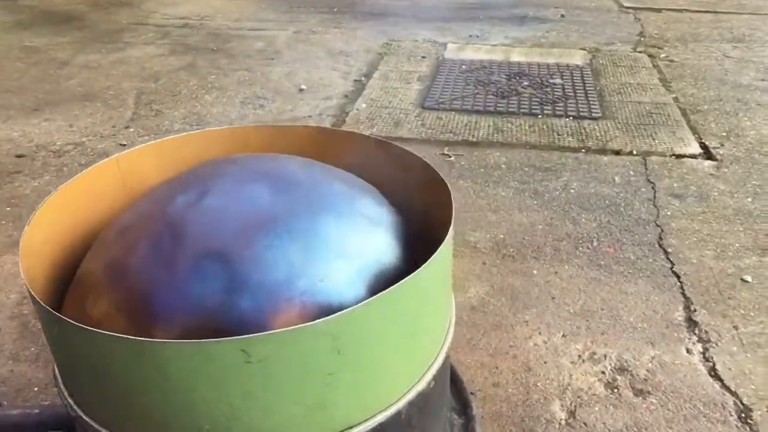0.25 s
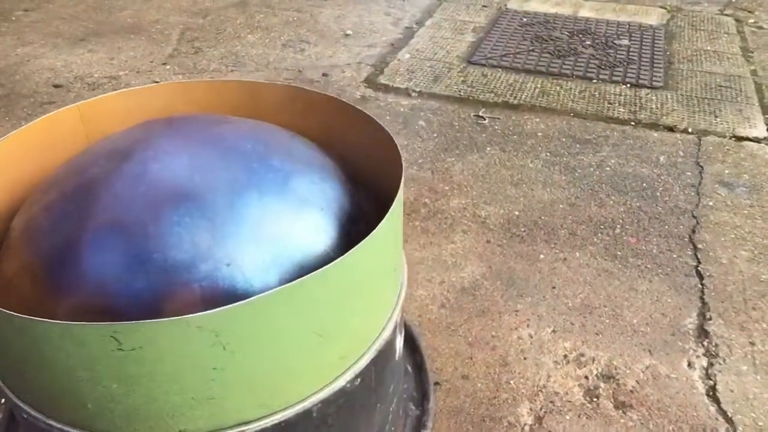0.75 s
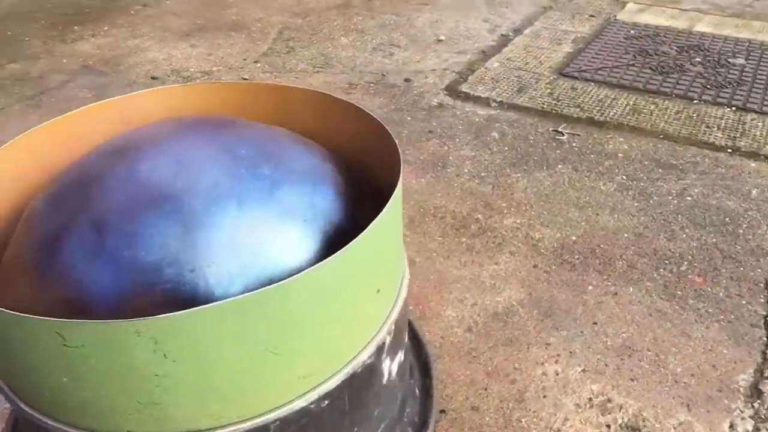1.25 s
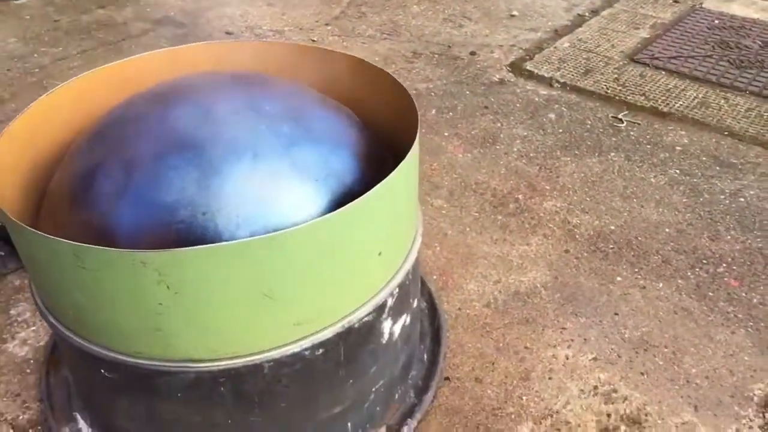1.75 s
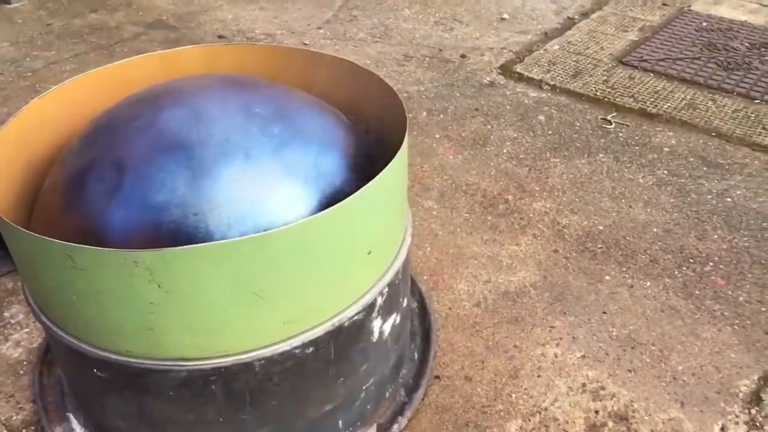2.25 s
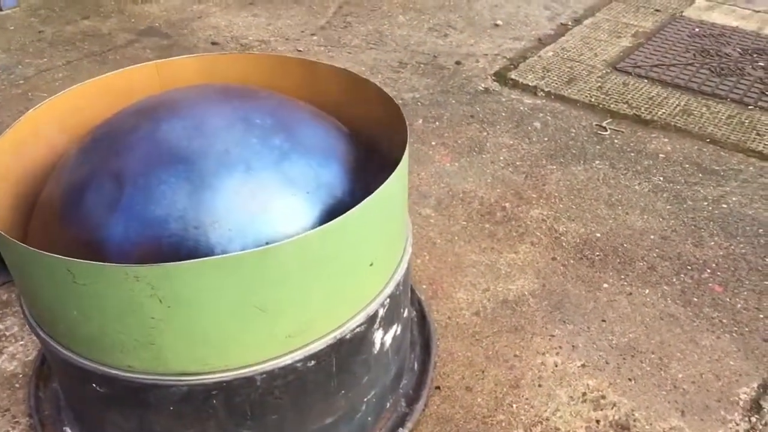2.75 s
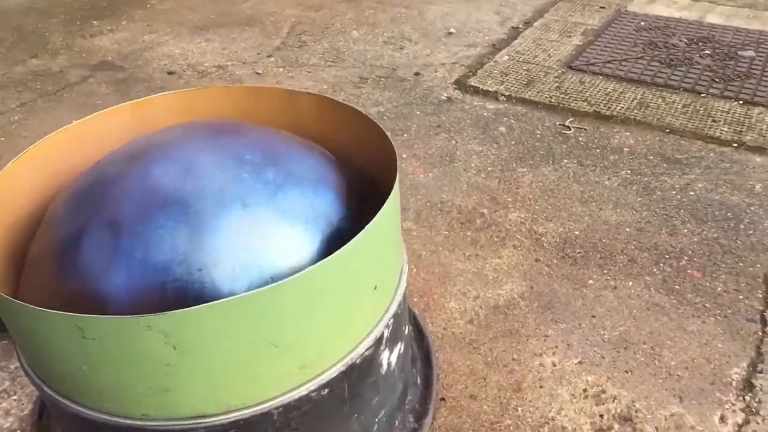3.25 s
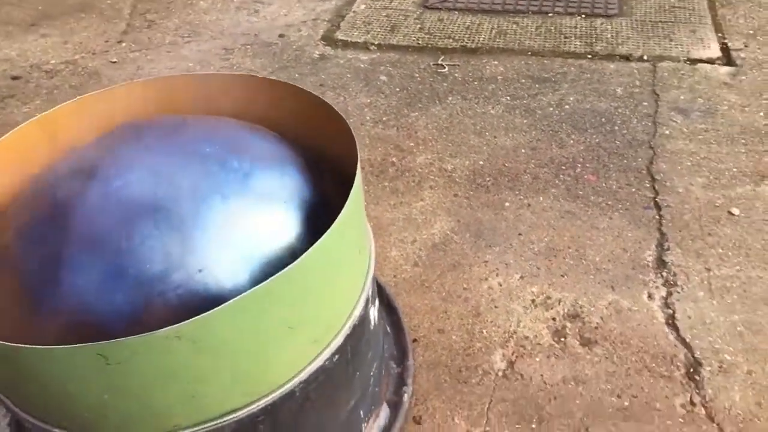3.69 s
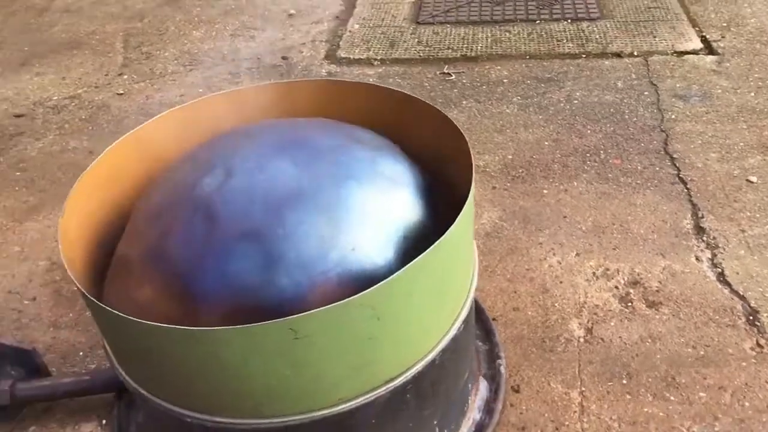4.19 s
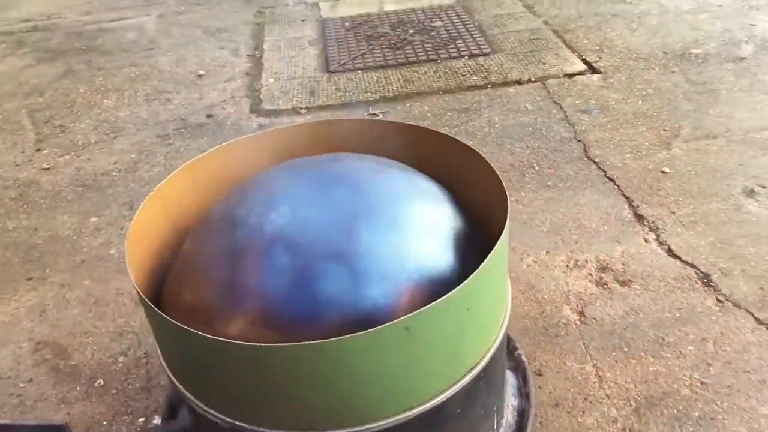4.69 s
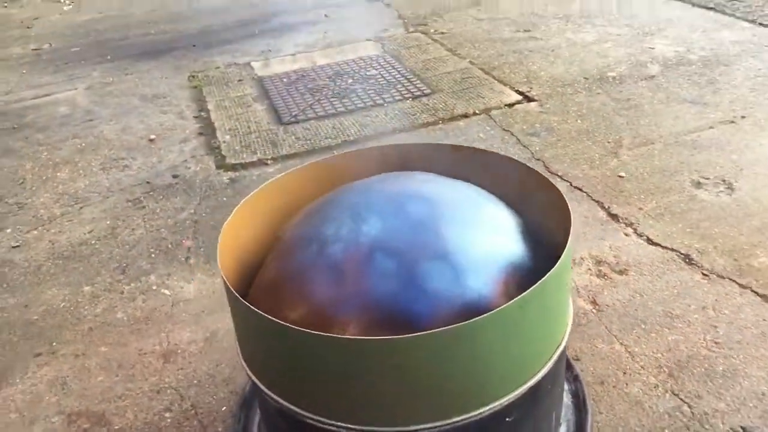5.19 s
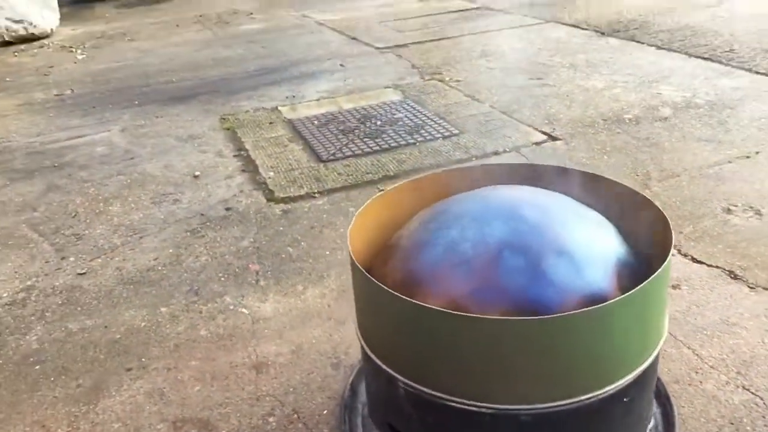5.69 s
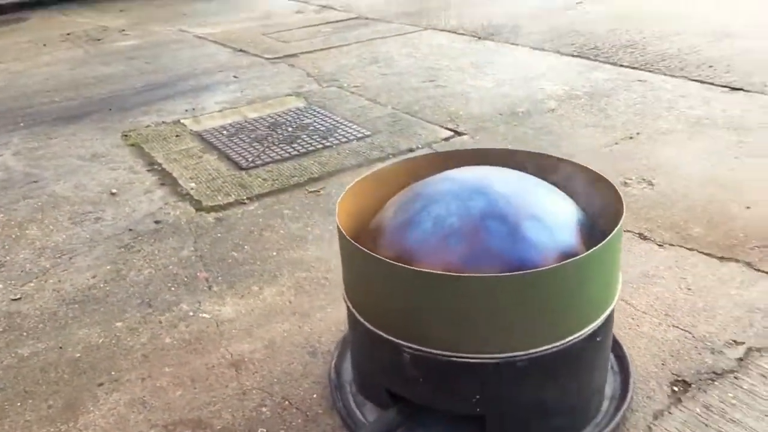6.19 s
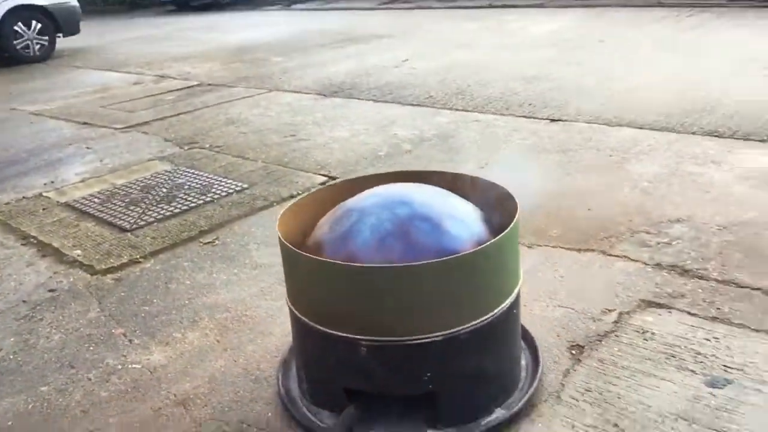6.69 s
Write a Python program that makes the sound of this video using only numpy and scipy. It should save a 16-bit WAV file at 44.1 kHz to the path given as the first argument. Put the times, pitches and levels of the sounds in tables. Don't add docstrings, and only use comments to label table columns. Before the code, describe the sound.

A large gas burner is already roaring at the start and never stops over about seven seconds. It burns under a steel dome inside a cut-down drum on an open concrete yard. The flame gives a deep, hollow, lumpy rumble, mostly low boom, with soft thuds as pockets of gas catch. Above it a bright, wide gas hiss sizzles and shimmers, faintly ringing with airy pipe overtones. The flame dips briefly at 0.7, then a short falling whoosh of wind passes at 1.2. The boom swells around 1.5, weakens after 2.3, and between 2.8 and 3.1 stutters in quick dips with a thud, a spurt of gas and another short gust. It fills out again near 4. From about 4.2 the microphone backs away; by 5.3 to 5.9 the hiss is stronger and more exposed, with small flutters and a faint gust. The roar continues to the end over a very faint distant wash.

```python
import sys
import numpy as np
from scipy import signal
from scipy.fft import rfft, irfft, next_fast_len
from scipy.io import wavfile
from scipy.ndimage import uniform_filter1d, map_coordinates

SR = 44100
rng = np.random.default_rng(int(sys.argv[2]) if len(sys.argv) > 2 else 0)


def int16_out(signal):
    q = np.round(np.clip(np.atleast_2d(signal).T, -1, 1) * 32767)
    wavfile.write(sys.argv[1], SR, q.astype(np.int16))


def field_ratio(decibels):
    return 10 ** (np.asarray(decibels, dtype=float) / 20)


N = 306054
N_FFT = next_fast_len(N)
HZ = np.arange(N_FFT // 2 + 1) * SR / N_FFT + 1e-3
COARSE_S = np.arange(N // 40 + 2) * 40 / SR
CUTOFF_HZ = 15720


def rms_one(x):
    return x / np.sqrt(np.mean(x ** 2) + 1e-20)


def in_time(rows):
    s, *columns = np.transpose(rows)
    return [np.interp(COARSE_S, s, c) for c in columns]


def at_hz(points, hz):
    points_hz, points_db = np.transpose(points)
    return np.interp(np.log(hz), np.log(points_hz), points_db)


def bumps(rows, clock):
    return sum(db * np.exp(-((clock - s) / half_s) ** 2) for s, half_s, db in rows)


def fine(control):
    return np.interp(np.arange(N) / SR, COARSE_S, control)


def drift(rate_hz):
    r = np.exp(-2 * np.pi * rate_hz * COARSE_S[1])
    settle = 2000
    noise = rng.standard_normal(len(COARSE_S) + settle)
    slow = signal.lfilter([1], [1, -2 * r, r * r], noise)[settle:]
    return rms_one(slow - slow.mean())


def turbulence(response):
    return rfft(rng.standard_normal(N_FFT)) * response


def evened(x, window_s):
    size = int(window_s * SR)
    power = uniform_filter1d(uniform_filter1d(x ** 2, size), size)
    return x / np.sqrt(power + 1e-20)


def slice_of(spectrum, centres_hz, k):
    triangle = np.interp(HZ, centres_hz, np.arange(len(centres_hz)) == k)
    return irfft(spectrum * triangle)[:N]


def flame():
    # [t/s, level/dB]
    vigour = [(0.0, -26), (.2, -27), (.32, -29.5), (.5, -27), (.62, -33.5), (.9, -32), (1.5, -26.5),
              (2.0, -28), (2.3, -32), (2.5, -29), (2.85, -31.5), (3.45, -32), (4.05, -26), (4.9, -27),
              (5.45, -29), (5.95, -33), (6.2, -29.5), (6.94, -32)]
    # [f/Hz, density/dB per Hz]
    rumble_colour = [(18, -60), (30, -39), (59, -11), (110, -5), (150, -1.5), (195, .5), (225, -7),
                     (257, -12), (288, -11.5), (305, -15.5), (335, -25.5), (360, -23.5), (397, -39),
                     (470, -49), (600, -69), (1000, -120)]
    # [t/s, half length/s, level/dB]
    thuds = [(.12, 0.11, 11.5), (.29, .03, 3.5), (1.1, 0.11, 3), (1.66, 0.028, 2), (1.9, .05, -1),
             (2.51, .04, 5), (2.74, 0.044, 5.5), (2.98, .03, 11), (3.25, 0.077, 6), (3.6, 0.055, 4),
             (4.05, .05, 4), (4.75, .06, 3), (5.16, 0.038, 1), (5.7, 0.069, 4), (6.17, 0.068, 4),
             (6.5, .08, 5), (6.86, 0.036, 8)]
    # [t/s, half length/s, level/dB]
    licks = [(.1, 0.1, 4), (.55, .1, 2), (.9, 0.072, -5.5), (1.75, 0.039, 0), (2.45, 0.1, 2.5),
             (2.65, 0.044, -2.5), (3.0, 0.086, 3), (3.48, 0.1, -4), (4.0, 0.21, 2.5), (4.65, 0.15, 2.5),
             (5.18, 0.069, 2.5), (5.6, 0.09, 4), (5.93, 0.075, -5), (6.52, 0.055, 7.5)]
    # [level/dB], [share of vigour swing], [chance surges/dB]
    voice_db = [-40.5, -30, -42]
    follow_vigour = [0.16, 1.0, 0.29]
    lumps_db = [2, 1.6, 2]

    noise = irfft(turbulence(field_ratio(at_hz(rumble_colour, HZ))))[:N]
    rumble = rfft(np.pad(noise, (0, N_FFT - N)))
    corners_hz = [95, 125, 215, 245]
    voice_gains = [[1, 0, 0, 0], [0, 1, 1, 0], [0, 0, 0, 1]]
    shares = [np.interp(HZ, corners_hz, gains) for gains in voice_gains]

    swing_db = in_time(vigour)[0] + 30
    levels_db = [db + follow * swing_db + lump_db * drift(7.0)
                 for db, follow, lump_db in zip(voice_db, follow_vigour, lumps_db)]
    levels_db[0] = levels_db[0] + bumps(thuds, COARSE_S)
    levels_db[2] = levels_db[2] + bumps(licks, COARSE_S)
    out = 0
    for db, share in zip(levels_db, shares):
        out = out + fine(field_ratio(db)) * evened(irfft(rumble * share)[:N], 0.17)
    return out


def pipe_ripple(between_db, widen):
    # [f/Hz, width/Hz, level/dB]
    overtones = [(554, 25, -6), (732, 28, -5), (964, 55, -2), (1250, 44, 0), (1555, 60, 0), (1850, 60, -1),
                 (1975, 50, -9), (2170, 60, -2), (2440, 53, -2), (2540, 50, -10), (2735, 55, -5),
                 (3020, 60, -4), (3280, 61, -7), (3580, 70, -14), (4215, 70, -15), (4515, 70, -7),
                 (4800, 70, -4), (5090, 60, -4), (5390, 110, -6), (5690, 80, -12), (6060, 80, -12),
                 (6365, 70, -11), (6690, 90, -13), (7500, 90, -13), (9030, 170, -11)]
    power = field_ratio(between_db) ** 2
    for hz, width_hz, level_db in overtones:
        detune = 2 * (HZ - hz) / (widen * width_hz)
        power = power + field_ratio(0.64 * level_db) ** 2 / (1 + detune ** 2) ** 2
    smooth = uniform_filter1d(power, int(600 / HZ[1]))
    return np.sqrt(power / smooth)


def jet_levels(at_place):
    # [t/s, level/dB]
    sight = [(0.0, -35.5), (.09, -42.5), (.23, -39), (.29, -36.5), (.56, -41), (.73, -34.5), (.9, -40.5),
             (1.3, -43.5), (1.95, -44), (2.7, -40), (3.45, -41), (3.73, -44.5), (4.06, -42), (4.3, -36),
             (5.19, -39), (5.26, -35), (5.87, -32.5), (6.94, -36.5)]
    # [t/s, half length/s, level/dB]
    spurts = [(.02, 0.024, 1.5), (.23, 0.027, 0.5), (.62, 0.097, 2.5), (1.2, .04, 0.5), (2.01, .03, 2.5),
              (2.14, 0.02, 5), (2.55, .025, 2), (2.68, 0.039, 1), (2.975, 0.031, 8), (3.2, .06, 0.5),
              (3.5, 0.03, 2.5), (4.25, 0.036, 1), (4.8, 0.4, 1.5), (5.1, 0.034, 3), (5.19, 0.03, -1),
              (5.3, .035, 4), (5.52, 0.02, 1), (5.69, .04, 3), (5.78, 0.024, 1.5), (5.87, .03, 3),
              (6.4, 0.035, -3.5), (6.55, .03, -2.5), (6.73, 0.05, 1), (6.84, .03, -2)]
    range_db = [
        [-52, -53, -51.5, -48, -47],
        [-44, -43.5, -43.5, -47.5, -47],
        [-44.5, -44.5, -44, -45.5, -43.5],
        [-39.5, -40.5, -41, -40, -40],
    ]
    follow_sight = [.3, .4, .95, 1.02]
    spurt_share = [0.91, 1.01, 0.96, 0.43]

    swing_db = in_time(sight)[0] + 39
    spurt_db = bumps(spurts, COARSE_S)
    return [at_place(db) + follow * swing_db + share * spurt_db
            for db, follow, share in zip(range_db, follow_sight, spurt_share)]


def jet():
    # [t/s, place 0-4 from close by to far back]
    viewpoint = [(0, 0.0), (.84, 0.0), (.9, 1.0), (4.0, 1.0), (4.25, 2.0), (5.1, 2.0), (5.3, 3.0),
                 (6.1, 3.0), (6.45, 4.0), (6.94, 4.0)]
    # [f/Hz, density/dB per Hz]
    pipe_colours = [
        [(400, -6), (554, -5), (732, -2.5), (964, -1.5), (1250, 5), (1560, 4.5), (1850, 3), (2170, 4),
         (2440, 2.5), (2730, -0.5), (3020, 2), (3280, -0.5)],
        [(400, -6), (554, -5), (732, -0.5), (964, -3), (1250, -2), (1560, -3.5), (1850, 1.3), (2170, -2.5),
         (2440, -0.5), (2730, -4.5), (3020, -4), (3280, -3.5)],
        [(400, -7.5), (554, -9), (732, -7), (964, -5.5), (1250, 4.2), (1560, 5), (1850, 3.5), (2170, 4.5),
         (2440, 1), (2730, -0.5), (3020, -2), (3280, -1)],
        [(400, 0), (554, -4.5), (732, 1.7), (964, 1.5), (1250, -1.5), (1560, 0), (1850, -1.5), (2170, -3),
         (2440, -3.5), (2730, -1.5), (3020, -3.5), (3280, -6.5)],
        [(400, 1.5), (554, 0.5), (732, 1.5), (964, 6.5), (1250, -4.5), (1560, 1), (1850, -4.5), (2170, -4),
         (2440, -4), (2730, -2.5), (3020, -0.5), (3280, -4)],
    ]
    # [f/Hz, density/dB per Hz]
    hiss_colours = [
        [(2000, -37), (3400, -10.5), (4070, -8.5), (4600, -11.5), (5320, -5), (7760, -8), (9290, -6),
         (10100, -12), (11100, -5), (12500, -7), (14600, -2.5), (15700, -4)],
        [(2000, -31), (3400, -3), (4090, 0), (4870, -6), (5530, 0), (6620, -2.5), (7810, -7), (9350, -5.5),
         (9900, -5), (13500, -4), (15100, -4.5), (15700, 3.5)],
        [(2000, -36), (3400, -5), (3990, -7), (4360, -1.5), (5060, -4), (5530, 3.5), (6620, -1), (8280, -11.5),
         (9110, -5.5), (10100, -7), (12000, -1.5), (15700, -4.5)],
        [(2000, -42), (3400, -8), (3670, -5.5), (4800, -7), (5860, 0.5), (7860, -10.5), (9050, 0.5),
         (10000, -9), (11100, 1), (12900, -8), (14600, 3), (15700, 2)],
        [(2000, -40), (3400, -7.5), (4600, -1.5), (5200, -6.5), (5860, 0.5), (7010, -7), (8170, -9.5),
         (9170, -2.5), (10200, -7), (12400, -4.5), (14700, 2), (15700, 1)],
    ]
    bypass_share = [0.3, 0.12, 0.088, 0.25, 0.14]
    # [shimmer/dB], [slow share of it]
    waver_depth_db = [0.58, 1.02, 1.42, 1.25]
    slow_share = [1.2, 0.56, 0.57, 0.99]

    place, = in_time(viewpoint)

    def at_place(values):
        return np.interp(place, np.arange(len(values)), values)

    plain = turbulence((HZ > 400) * np.interp(HZ, [CUTOFF_HZ + 200, CUTOFF_HZ + 300], [1, 0]))
    plain = plain / np.sqrt(np.mean(irfft(plain) ** 2))
    ringing = irfft(plain * pipe_ripple(between_db=-12.5, widen=1.21))
    slip = np.cumsum(0.003 * fine(drift(0.8)))
    ringing = map_coordinates(ringing, [np.arange(N) + slip], order=3, mode="wrap")
    ringing = rfft(ringing, N_FFT)
    plain = plain * np.exp(2j * np.pi * rng.random(len(HZ)))
    flutter_db = 0.29 * drift(19) + 0.5 * drift(25)

    pipe_hz = np.array(pipe_colours[0])[:, 0]
    hiss_hz = np.arange(5800, CUTOFF_HZ + 300, 400)
    centres_hz = np.concatenate([pipe_hz, np.arange(3600, 5500, 300), hiss_hz])
    group = np.searchsorted([1100, 3400, 8500], centres_hz)
    colours = []
    for hz, g in zip(centres_hz, group):
        tables = pipe_colours if g < 2 else hiss_colours
        colours.append(field_ratio(at_place([at_hz(c, hz) for c in tables])))
    colours = np.array(colours)
    widths = np.gradient(centres_hz) / (CUTOFF_HZ - 400)

    levels_db = jet_levels(at_place)
    bypass = fine(np.clip(at_place(bypass_share), 0, 1))
    out = 0
    for k, g in enumerate(group):
        range_rms = np.sqrt(widths[group == g] @ colours[group == g] ** 2)
        shimmer = slow_share[g] * drift(0.95) + 1.72 * drift(13.8)
        waver_db = flutter_db + waver_depth_db[g] * shimmer
        band = slice_of(ringing, centres_hz, k)
        if 4000 < centres_hz[k] < 5600:
            band = np.sqrt(1 - bypass) * band + np.sqrt(bypass) * slice_of(plain, centres_hz, k)
        out = out + fine(field_ratio(levels_db[g] + waver_db) * colours[k] / range_rms) * band
    return out


def yard():
    # [f/Hz, density/dB per Hz]
    air_colour = [(200, -30), (330, 5), (600, -10), (1000, -2), (1600, -11), (3000, -30), (6000, -90)]
    return field_ratio(-60) * rms_one(irfft(turbulence(field_ratio(at_hz(air_colour, HZ))))[:N])


def falter():
    # [t/s, half length/s, level/dB]
    dips = [
        (.69, 0.028, -10),
        (2.797, 0.012, -12),
        (2.908, 0.024, -7),
        (3.07, 0.078, -5.5),
        (5.53, 0.044, -3.5),
        (5.82, .04, -3),
    ]
    return field_ratio(bumps(dips, COARSE_S))


def gust():
    # [peak t/s, half length/s, f at peak/Hz, fall/Hz per s, level/dB]
    snatches = [
        (1.174, 0.05, 584, 8000, -45.5),
        (3.046, .025, 702, 2500, -47),
        (5.36, .035, 457, 330, -53),
    ]
    t = np.arange(N) / SR
    lowpass = signal.butter(2, 120, fs=SR, output="sos")
    spread = signal.sosfilt(lowpass, rng.standard_normal((2, N)))
    spread = rms_one(spread[0]) + 1j * rms_one(spread[1])
    out = 0
    for s, half_s, hz, fall_hz_per_s, level_db in snatches:
        cycles = hz * (t - s) - fall_hz_per_s * (t - s) ** 2 / 2
        carrier = np.exp(2j * np.pi * cycles)
        swell = np.exp(-((t - s) / half_s) ** 2)
        out = out + field_ratio(level_db) * swell * np.real(carrier * spread)
    return out


def scene():
    mono = fine(falter()) * flame() + jet() + gust() + yard()
    return np.tile(mono, (2, 1))


def band_limit(x):
    return signal.sosfilt(signal.butter(12, 16820, fs=SR, output="sos"), x)


def record(dry):
    # [t/s, low f/Hz, high f/Hz]
    refills = [(.252, 13700, 15700), (.392, 11700, 13900), (.392, 8200, 9800), (.415, 13000, 14600),
               (1.111, 13700, 15300), (1.344, 4100, 5800), (1.344, 6200, 8400), (1.344, 8900, 10500),
               (1.878, 4100, 5300), (2.18, 4600, 5800), (2.807, 5000, 7000), (2.807, 8200, 10500),
               (2.807, 13000, 14600), (3.016, 13700, 15700), (3.503, 7500, 9100), (3.898, 8200, 9800),
               (3.898, 10300, 11900), (5.175, 5100, 6400), (6.313, 5700, 7000), (6.313, 8200, 10500),
               (6.313, 13000, 15300), (6.429, 13000, 14600)]
    side = np.zeros(N)
    hop, offset = 1024, 889
    bins_hz = np.arange(hop + 1) * SR / (2 * hop)
    for s, low_hz, high_hz in refills:
        at = offset + hop * (round((s * SR - offset) / hop) - 1)
        earlier = dry[0, at - 2 * hop:at]
        band = irfft(rfft(earlier) * (bins_hz > low_hz) * (bins_hz < high_hz))
        side[at:at + 2 * hop] += field_ratio(-2.5) * band * np.hanning(2 * hop)
    both = rfft(dry + side * [[1], [-1]], N_FFT) * (HZ < CUTOFF_HZ)
    return band_limit(irfft(both)[:, :N])


dry = scene()
out = record(dry)
int16_out(out)
```